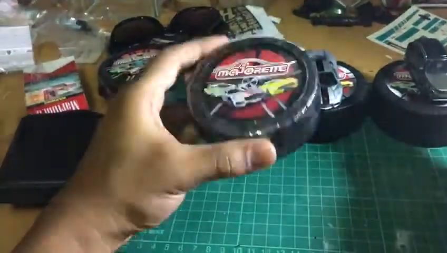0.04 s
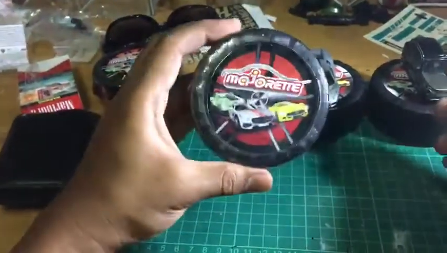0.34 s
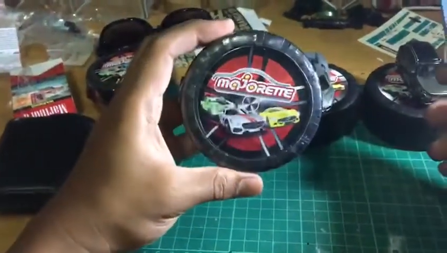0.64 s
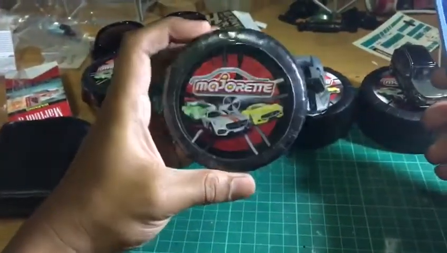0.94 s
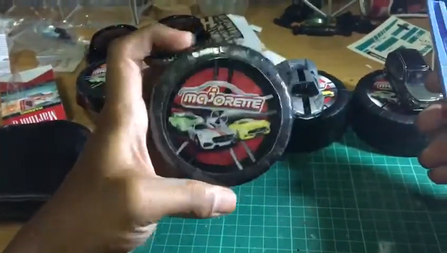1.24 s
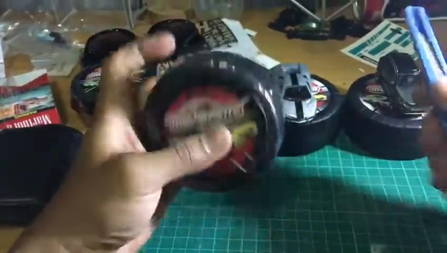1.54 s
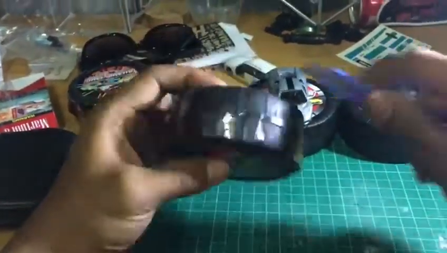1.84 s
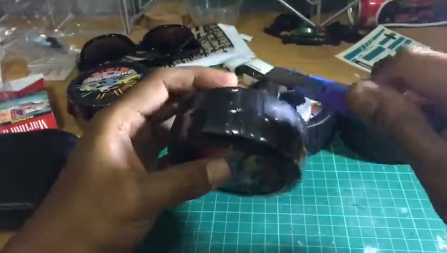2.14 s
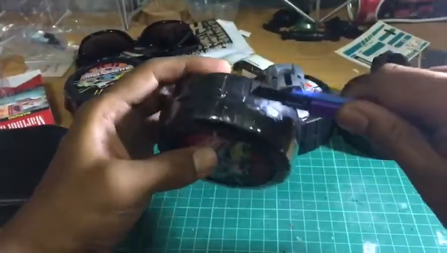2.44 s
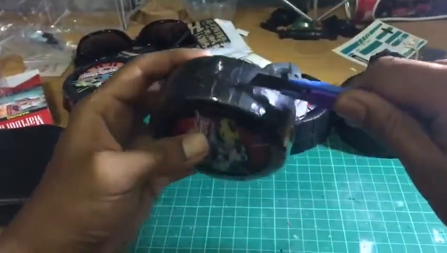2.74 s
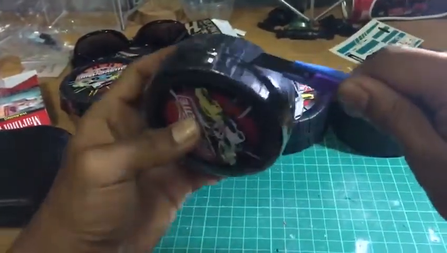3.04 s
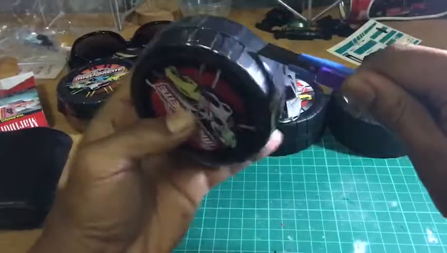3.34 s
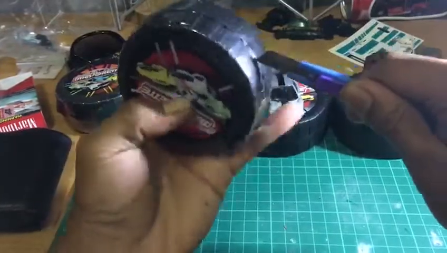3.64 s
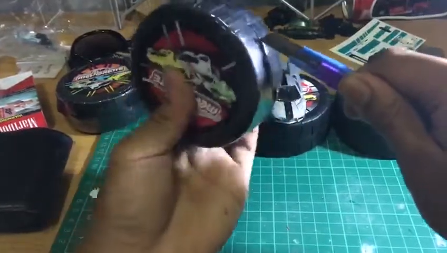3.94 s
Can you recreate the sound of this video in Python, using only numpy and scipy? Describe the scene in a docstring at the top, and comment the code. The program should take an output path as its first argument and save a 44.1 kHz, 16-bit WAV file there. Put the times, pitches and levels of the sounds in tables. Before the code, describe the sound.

A snap-off cutter clicks and rasps open, then ticks against a hollow plastic case.

```python
"""At a desk in a small room, someone handles a snap-off cutter close to the microphone. Its slider clicks over
a row of teeth, making a rasp as the blade comes out. The blade then ticks and scrapes on a wrapped plastic
case. As the hollow case is lifted it clacks against its neighbours; later, fingers knock on it, and handling
sends dull bumps and rumble through the desk."""
import sys
import numpy as np
from scipy import signal
from scipy.fft import rfft, irfft
from scipy.io import wavfile
from scipy.ndimage import uniform_filter1d, map_coordinates

SR = 44100
rng = np.random.default_rng(int(sys.argv[2]) if len(sys.argv) > 2 else 0)


def transcribe(signal):
    """Save signal, clipped to [-1, 1], as a 16-bit WAV file at the path in sys.argv[1]."""
    frames = np.atleast_2d(signal).T
    limited = np.clip(frames, -1, 1)
    pcm = np.round(limited * 32767).astype(np.int16)
    wavfile.write(sys.argv[1], SR, pcm)


N = 176400

# Levels are relative: the code adds further gains. A fade is the time a sound takes to drop 60 dB.
# Tone of each noise, from bass to treble: pitch_hz, level_db
ROOM_TONE = [(25, -10.5), (60, 5.5), (300, -13), (700, -21.5), (1200, -18.5), (2500, -28), (5000, -35.5),
             (11000, -42)]
RUMBLE_TONE = [(20, -13), (40, -4.5), (60, -0.5), (100, -5), (180, -13.5), (300, -30), (700, -81)]
RUB_TONE = [(70, 5), (170, 4.5), (310, -3), (550, -20.5), (900, -48.5)]
SCRAPE_TONE = [(600, 6.5), (1200, 7.5), (2600, -1), (3750, 4.5), (5200, 1), (8000, -1), (11000, -4)]
CRACK_TONE = [(500, -5.5), (2000, 4), (2750, -1), (4000, 7.5), (4900, -2.5), (6500, -1.5), (9000, -8.5),
              (12000, -19.5)]
CUTTER_TONE = [(300, -15), (1500, -14), (2600, -0.5), (3600, 7), (5000, 6.5), (6300, 12), (8000, 5),
               (9900, 8.5), (10400, 6.5), (11300, 3.5)]
# How strongly the hands make the desk rumble: time_s, level_db
HAND_EFFORT = [(0.06, -37.5), (0.18, -33.5), (0.36, -41), (0.52, -29), (0.62, -40.5), (0.68, -28.5),
               (0.74, -38), (0.9, -26), (1.1, -35), (1.4, -35), (1.46, -44), (1.559, -28.5), (1.62, -33.5),
               (1.76, -28), (1.898, -41.5), (2.03, -27.5), (2.08, -41), (2.118, -29.5), (2.18, -34.5),
               (2.38, -28.5), (2.64, -40.5), (2.79, -33), (2.87, -36.5), (3.043, -27), (3.12, -46),
               (3.202, -29), (3.31, -44), (3.37, -32.5), (3.43, -36.5), (3.53, -31.5), (3.63, -37.5),
               (3.73, -31.5), (3.81, -40), (3.99, -32)]
# Soft bumps through the desk: start_s, level_db, pitch_hz
DESK_BUMPS = [(0.118, -22, 62), (0.181, -17.5, 72), (0.543, -20.5, 153), (0.675, -24, 166),
              (0.8246, -14, 192), (0.9162, -21.5, 210), (.877, -25, 109), (0.999, -24, 218),
              (1.107, -20, 113), (1.188, -23.5, 131), (1.215, -22, 166), (1.546, -24.5, 223),
              (1.7435, -17.5, 258), (1.993, -22, 125), (2.037, -21.5, 75.5), (2.251, -22.5, 175),
              (2.278, -18, 150), (2.336, -19.5, 137), (2.952, -16.5, 136), (3.2068, -21, 217)]
# Strokes of the blade along the wrapping: middle_s, half_length_s, level_db
BLADE_STROKES = [(2.974, 0.14, -53.5), (3.371, 0.065, -51), (3.514, 0.018, -43), (3.57, 0.039, -48),
                 (3.643, 0.021, -42), (3.909, 0.027, -46.5)]
# Knocks on the case: start_s, level_db, pitch_hz, hardness_db
CASE_KNOCKS = [(0.0778, -19, 1576, 1), (0.0985, -15.5, 1645, -1.5), (0.1142, -35, 1560, 10),
               (0.188, -21, 1657, 1), (1.2271, -19.5, 1243, -19.5), (1.228, -26.5, 2180, -16),
               (1.3727, -25, 1310, -16.5), (1.5538, -28.5, 1780, 11.5), (1.72, -10.5, 1380, -31.5),
               (1.7205, -11, 2270, -10), (1.7683, -24.5, 1660, -26), (2.0666, -20, 1194, -1),
               (2.075, -23.5, 1140, -1), (3.162, -26.5, 1240, -21), (3.6418, -27.5, 1230, 1.5),
               (3.6924, -26.5, 890, -7), (3.9048, -29.5, 1160, -12), (3.9489, -29.5, 1330, -4.5)]
# Ringing notes of the case: ratio_to_main_pitch, level_db, fade_s
CASE_NOTES = [(.56, -10, 0.036), (.86, 1.5, 0.025), (1.0, 8, 0.015), (1.12, -5, 0.024), (1.42, -2.5, 0.013)]
# Low notes of the air and lid of the case: pitch_hz, level_db, fade_s
BOOM_NOTES = [(296, -8, 0.032), (518, -9, 0.036), (585, -9.5, 0.064)]
# Thin ring of the blade: pitch_hz, level_db, fade_s
BLADE_NOTES = [(4540, -32, 0.12)]
# Single ticks of the cutter: start_s, level_db, treble_db
BLADE_TICKS = [(.785, -14, -15), (1.337, -36.5, 8.5), (1.5655, -12, -5), (1.9247, -30, -0.5),
               (2.014, -21, -18), (2.0355, -16.5, -17), (2.0524, -14.5, -4.5), (2.1152, -3.5, -1.5),
               (2.1329, -8, -4), (2.4923, -27.5, 2.5), (2.5779, -22.5, -15), (2.6872, -27.5, 1.5),
               (2.8416, -27, 3), (3.0533, -23.5, 2.5), (3.1391, -13, -18), (3.6268, -28.5, 11),
               (3.655, -34.5, 10), (3.856, -24, 2.5)]
# Ringing notes of the slider's track: first_pitch_hz, last_pitch_hz, peak_db, travel_at_peak (0 to 1)
TRACK_NOTES = [(3770, 2920, -4.5, 0.22), (4064, 4190, 0, 0.71), (4690, 4450, -4, 0.73),
               (6180, 5450, -0.5, 0.33), (6990, 6350, 0.5, 0.36), (8230, 7650, -1.5, .98),
               (11650, 7500, -6, 0.55)]
# Clicks of the slider over the teeth: start_s, level_db
SLIDER_TEETH = [(1.516, -11), (1.552, -9), (1.5807, -8), (1.6046, -7.5), (1.6209, -8.5), (1.6334, -9),
                (1.6447, -11.5), (1.6538, -8.5), (1.6624, -10.5), (1.6702, -8.5), (1.6788, -10),
                (1.6866, -9), (1.695, -7.5), (1.7026, -8.5), (1.714, -7), (1.7262, -10), (1.739, -13),
                (1.7526, -11), (1.7688, -8), (1.796, -9)]

ROOM_NOISE_DB, RUB_DB, BUMP_DB = -44.5, 12, 2
KNOCK_DB, BOOM_DB, TICK_DB, RATCHET_DB = -6.5, -7.5, -5.5, -2
SNAP_RISE_S, TRACK_FADE_S = 0.0006, 0.013


def undb(db):
    """Turn decibels into a number to multiply a sound by."""
    return 10 ** (np.asarray(db) / 20)


def unit(x):
    """Scale a signal to an average strength (rms) of 1."""
    return x / np.sqrt(np.mean(x ** 2))


def noise(tone, size):
    """Noise of strength 1, shaped by a tone table."""
    hz, db = np.array(tone, float).T
    bins_hz = np.maximum(np.fft.rfftfreq(size, 1 / SR), 1)
    gain = undb(np.interp(np.log(bins_hz), np.log(hz), db))
    return unit(irfft(rfft(rng.standard_normal(size)) * gain, size))


def age():
    """Seconds since a hit, for a quarter of a second."""
    return np.arange(SR // 4) / SR


def decay(fade_s):
    """A hit dies away, dropping 60 dB in fade_s."""
    return np.exp(-np.log(1000) * age() / fade_s)


def rise(seconds):
    """The soft start of a contact."""
    return (1 - np.exp(-age() / seconds)) ** 2


def ring(notes, scale=1):
    """Fading notes of a struck object; their pitch varies a little from hit to hit."""
    out = 0
    for pitch, db, fade_s in notes:
        hz = pitch * scale * (1 + 0.012 * rng.standard_normal())
        out += undb(db) * decay(fade_s) * np.sin(2 * np.pi * (hz * age() + rng.random()))
    return out


def grain(db, hz):
    """Uneven grip: a sliding contact catches and slips about hz times a second."""
    width = max(int(SR / hz), 1)
    grip = uniform_filter1d(rng.standard_normal(N), width)
    grip = uniform_filter1d(grip, width, mode="wrap")
    return unit(undb(db * unit(grip)))


def add(out, start_s, sound):
    """Mix a sound in at a given time."""
    i = max(int(start_s * SR), 0)
    out[i:i + len(sound)] += sound[:N - i]


def background():
    """Steady room noise."""
    return undb(ROOM_NOISE_DB) * noise(ROOM_TONE, N)


def handling():
    """The desk rumbles as the hands move; firmer rubbing is brighter and stutters."""
    effort = undb(np.interp(np.arange(N) / SR, *np.array(HAND_EFFORT).T))
    rub = undb(RUB_DB) * effort ** 1.61 * grain(db=4.5, hz=70) * noise(RUB_TONE, N)
    return effort * noise(RUMBLE_TONE, N) + rub


def bumps(rise_cycles=0.46):
    """Each dull bump shakes the desk for only a swing or two."""
    out = np.zeros(N)
    for start, db, hz in DESK_BUMPS:
        cycles = age() * hz
        push = cycles / rise_cycles
        swell = (push * np.exp(1 - push)) ** 1.29
        add(out, start, undb(db + BUMP_DB) * swell * -np.cos(2 * np.pi * cycles))
    return out


def scrapes():
    """The blade drags along the wrapping in short, grainy strokes."""
    t = np.arange(N) / SR
    pressure = sum(undb(db) * np.exp(-((t - middle) / half) ** 2) for middle, half, db in BLADE_STROKES)
    return pressure * grain(db=4.5, hz=900) * noise(SCRAPE_TONE, N)


def knocks():
    """A hard knock on the hollow case cracks, a soft one booms; grip and spot set the pitch."""
    out = np.zeros(N)
    for start, db, hz, hardness_db in CASE_KNOCKS:
        crack = noise(CRACK_TONE, len(age())) * rise(0.000067) * decay(0.023)
        shell = ring(CASE_NOTES, hz)
        boom = undb(BOOM_DB - hardness_db / 2) * ring(BOOM_NOTES)
        body = undb(-4) * rise(0.0001) * (shell + boom)
        add(out, start, undb(db + KNOCK_DB) * (body + undb(hardness_db) * crack))
    return out


def snap(notes, grit):
    """One click of the cutter: a noisy crack, short notes and the thin ring of the blade."""
    crack = undb(-4) * grit * decay(0.023)
    return rise(SNAP_RISE_S) * (crack + ring(notes) + ring(BLADE_NOTES))


def ticks(ring_hz=3600, ring_db=-5.5, treble_hz=5900):
    """The blade shifts in its track or catches on the case; each tick has its own brightness."""
    out = np.zeros(N)
    treble_filter = signal.butter(2, treble_hz, "high", fs=SR)
    for start, db, treble_db in BLADE_TICKS:
        hz = ring_hz * (1 + 0.35 * (rng.random() - 0.5))
        click = snap([(hz, ring_db, TRACK_FADE_S)], noise(CUTTER_TONE, len(age())))
        treble_change = (undb(treble_db) - 1) * signal.filtfilt(*treble_filter, click)
        add(out, start, undb(db + TICK_DB) * (click + treble_change))
    return out


def track(travel, reach=0.25, far_db=-11):
    """The track's notes glide and swell in turn as the slider travels from 0 to 1."""
    notes = []
    for first_hz, last_hz, db, travel_at_peak in TRACK_NOTES:
        hz = first_hz + (last_hz - first_hz) * travel
        away = 1 - np.exp(-((travel - travel_at_peak) / reach) ** 2)
        notes.append((hz, db + far_db * away, TRACK_FADE_S))
    return notes


def ratchet(shared_part=0.15, lead_in_s=0.0035, lead_in_db=-34):
    """The slider's spring drops behind each tooth with a click."""
    out, size = np.zeros(N), len(age())
    shared = noise(CUTTER_TONE, size)
    for travel, (start, db) in zip(np.linspace(0, 1, len(SLIDER_TEETH)), SLIDER_TEETH):
        # The noise that all clicks share sinks in pitch as the blade comes out.
        pitch_ratio = 1 + 0.1 * (0.5 - travel)
        shifted = map_coordinates(shared, [np.arange(size) * pitch_ratio], mode="mirror")
        grit = np.sqrt(shared_part) * shifted + np.sqrt(1 - shared_part) * noise(CUTTER_TONE, size)
        add(out, start, undb(db + RATCHET_DB) * snap(track(travel), grit))
        # A faint, brief hiss swells just before each click.
        lead_in = age() / lead_in_s * (age() < lead_in_s) * noise(CUTTER_TONE, size)
        add(out, start - lead_in_s, undb(db + lead_in_db) * lead_in)
    return out


def room(sound, delay_s=0.0033):
    """Sound bounces quickly off the desk and lingers briefly between the walls."""
    echoes = np.zeros(N)
    for db, fade_s in ((-11.5, 0.14), (-19.5, 0.39)):  # desk, walls
        tail = rng.standard_normal(len(age())) * decay(fade_s)
        add(echoes, delay_s, undb(db) * tail / np.linalg.norm(tail))
    return sound + signal.fftconvolve(sound, echoes)[:N]


def scene():
    """The cutter and case echo in the room, over desk sounds and room noise."""
    cutter_and_case = room(ratchet() + ticks() + knocks() + scrapes())
    return (cutter_and_case + handling() + bumps() + background())[None]


def record(dry, low_hz=33, high_hz=12100):
    """The recorder drops the deepest bass and steeply cuts the highest treble."""
    dry = signal.sosfilt(signal.butter(4, low_hz, "high", fs=SR, output="sos"), dry)
    return signal.sosfilt(signal.ellip(10, 0.3, 70, high_hz, fs=SR, output="sos"), dry)


dry = scene()
out = record(dry)
transcribe(out)
```